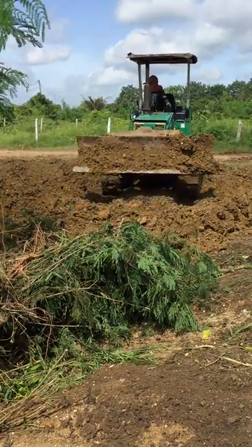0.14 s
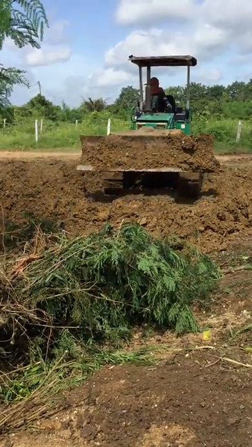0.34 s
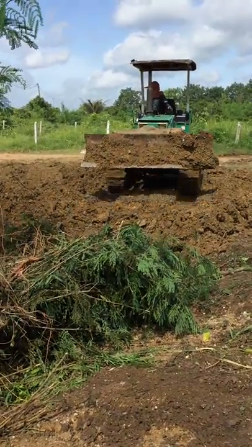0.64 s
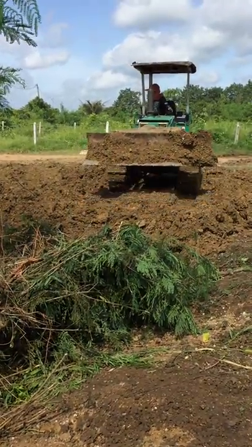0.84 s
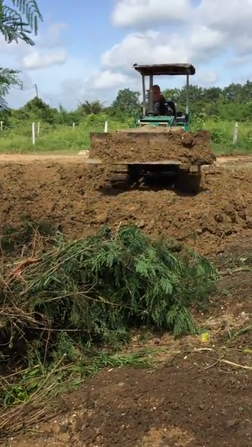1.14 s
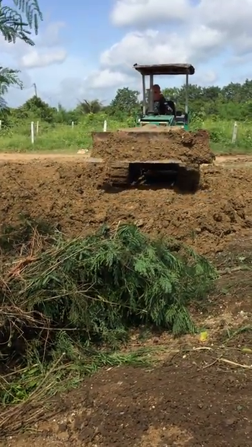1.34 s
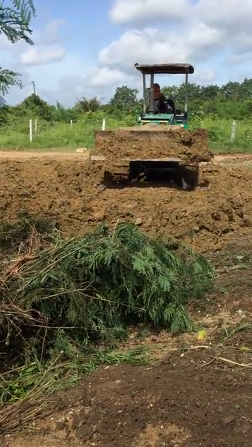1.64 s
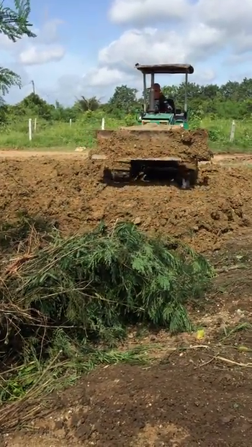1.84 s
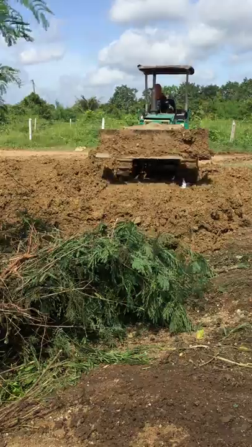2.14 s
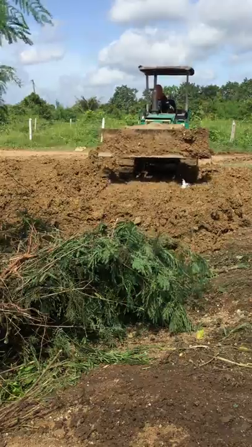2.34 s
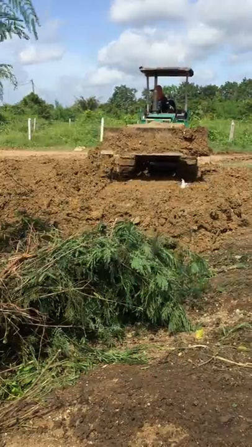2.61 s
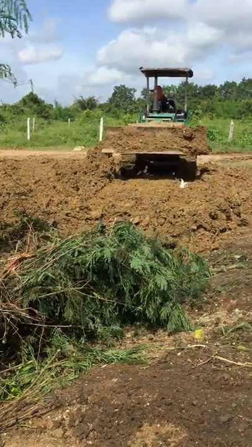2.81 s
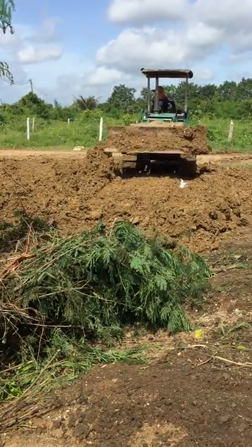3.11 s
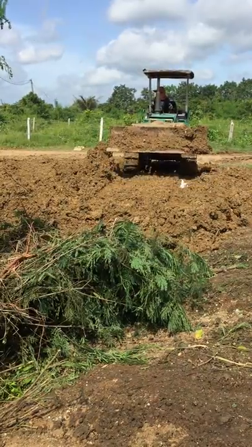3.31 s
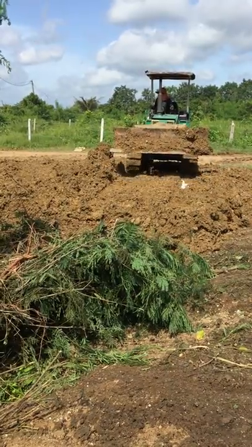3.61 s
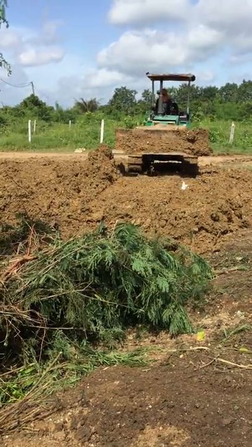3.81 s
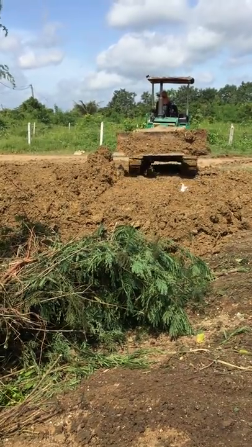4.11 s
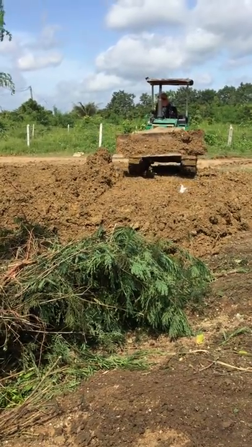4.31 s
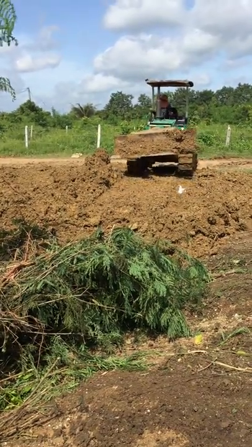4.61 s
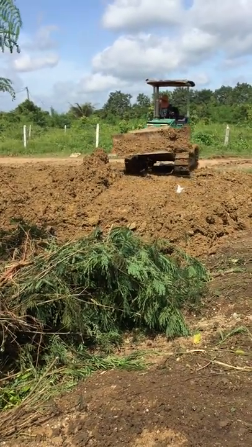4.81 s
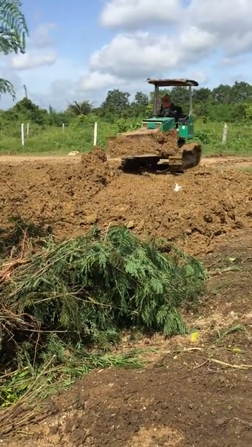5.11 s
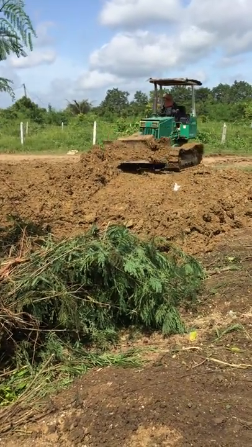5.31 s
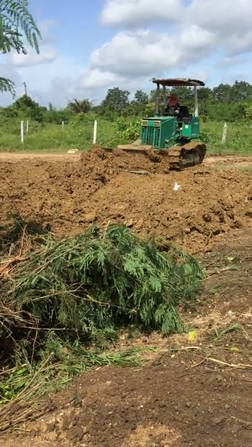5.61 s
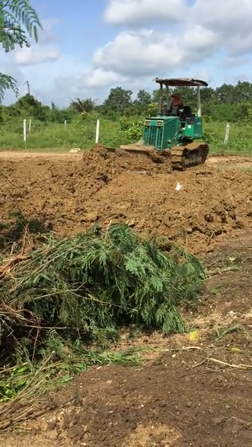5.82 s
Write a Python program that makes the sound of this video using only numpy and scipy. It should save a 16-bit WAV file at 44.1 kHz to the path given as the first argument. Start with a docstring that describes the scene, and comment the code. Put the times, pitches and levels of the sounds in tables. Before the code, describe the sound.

Outdoors on open soft ground, a small crawler bulldozer runs at a steady low diesel drone with metallic clatter and hiss. It backs slowly away from a fixed microphone about nine metres off while track links knock irregularly. A brief faint brake squeal comes midway, then a thin hydraulic whine; during the final turn the knocks nearly stop and thin squeals and a rasp appear.

```python
"""Open ground of soft soil: a small crawler bulldozer backs away from the microphone, from about 9 m,
then brakes one track and turns. Dull noise and hiss lie behind it, with a faint hydraulic whine.
Track links knock, ringing frame modes; thin squeals are wavering sines and the late rasp is resonant noise.
Closest to the ear is the four-cylinder diesel: noise swelling with combustion rings block and covers,
and gas pulses ring the exhaust pipe."""
import sys
import numpy as np
from scipy import signal
from scipy.fft import rfft, irfft, next_fast_len
from scipy.io import wavfile
from scipy.ndimage import uniform_filter1d

SR = 44100
rng = np.random.default_rng(int(sys.argv[2]) if len(sys.argv) > 2 else 0)


def master_out(mix):
    """Clip the mix to full scale and print it as 16-bit PCM to the path in sys.argv[1]."""
    frames = np.transpose(np.atleast_2d(mix))
    ceiling = np.clip(frames, -1, 1)
    pcm = np.round(ceiling * 32767).astype(np.int16)
    wavfile.write(sys.argv[1], SR, pcm)


N = 262395

# Engine speed. Each row: time in seconds, firings per second.
ENGINE_SPEED = [(0.0, 57.46), (0.2, 57.6), (0.4, 57.25), (0.6, 57.58), (0.8, 57.34), (1.0, 57.82),
                (1.2, 57.74), (1.4, 57.39), (1.6, 57.59), (1.8, 57.35), (2.0, 57.51), (2.2, 57.55),
                (2.4, 57.57), (2.6, 57.57), (2.8, 57.54), (3.0, 57.54), (3.2, 57.69), (3.4, 57.32),
                (3.6, 57.26), (3.8, 57.34), (4.0, 56.86), (4.2, 56.43), (4.4, 56.64), (4.6, 56.21),
                (4.8, 55.59), (5.0, 56.54), (5.2, 55.87), (5.4, 57.19), (5.6, 58.77), (5.8, 57.69),
                (5.95, 57.49)]
# Cylinders in firing order. Each row: place of the exhaust pulse in the cycle (0-1), then strength in dB
# for exhaust, covers, block and hiss.
CYLINDERS = [(.2028, -7.1, -2, -5, -3.5), (.4692, -2.9, -7, -1, -1), (.6795, -11.3, 0, -4, -2.5),
             (.9684, 0, 0, 0, 0)]
EXHAUST_COLUMN, COVER_COLUMN, BLOCK_COLUMN, HISS_COLUMN = 1, 2, 3, 4
GOVERNED_PER_S, FULL_SAG_PER_S = 57.4, 1.2  # firings per second unloaded; speed lost at full load

# The machine's place: metres at time zero, metres per second backing away.
START_M, BACKING_M_PER_S = 8.73, 1.16
TURN_S, TURN_LENGTH_S = 5.18, 0.24  # the flank swings round to face the microphone
BRAKE_FROM_S, BRAKE_TO_S, BRAKE_EDGE_S = 3.52, 4.08, 0.065  # the steering brake drags

# How levels follow the machine. Each row: base in dB, share of the distance loss,
# then dB added at full load, full turn and full brake.
RUMBLE_LEVEL = (-34, 1.01, 1.6, 2, 0.5)
HUM_LEVEL = (0, 0.9, 8, -13, 3.5)
HISS_LEVEL = (-45.5, 1.5, 0, 5, 3)
# The block's lean to its upper modes, by the same rule, in dB per octave.
BLOCK_LEAN_DB_PER_OCT = (-6, 2.5, 13, 8, -8)

# Soil, tracks and fan. Each row: frequency in Hz, relative density in dB per Hz.
RUMBLE_SPECTRUM = [(15, -47), (25, -24), (48, -12.5), (85, -10), (125, -7), (186, -7.5), (281, -19.5),
                   (408, -21), (1470, -24), (1880, -27.5), (2130, -31), (2850, -47), (3500, -39),
                   (4550, -84), (7700, -120)]
# Valve gear and gas. Each row: frequency in Hz, relative density in dB per Hz.
HISS_SPECTRUM = [(1760, 3), (3000, -1.5), (3170, -3.5), (3570, -1.5), (3900, -9.5), (4270, -5.5),
                 (4840, -11), (5260, -9.5), (6080, -9.5), (7690, -18), (9670, -13.5), (10500, -19),
                 (11600, -16.5), (14200, -19.5), (15700, -18)]
# Lift of the hiss bands above 6.5 kHz. Each row: time in seconds, lift in dB.
TREBLE_LIFT = [(0, 0), (2.2, 1.6), (2.8, -2.5), (3.45, -3), (3.65, 0.5), (4.4, 3.5), (5.0, 2), (5.95, 1.5)]
# Hydraulic whine. Each row: time in seconds, pitch in Hz, level in dB.
PUMP_WHINE = [(3.95, 680, -54), (4.05, 681, -46.5), (4.17, 681, -50), (4.21, 676, -60), (4.27, 680, -46),
              (4.4, 679, -51), (4.55, 675, -50), (4.72, 677, -51), (4.9, 676, -58)]

# Track frame modes. Each row: frequency in Hz, strength in dB, time to fall 60 dB in seconds.
FRAME_MODES = [(397, 8.5, 0.037), (476, 7.5, 0.044), (569, 2, 0.051), (710, 7, 0.029), (788, 9, 0.024),
               (970, 7, 0.039), (1150, 10.5, 0.026), (1280, 6.5, 0.022), (1560, -2, 0.012),
               (1816, 7.5, 0.028), (2200, 0, 0.012)]
# Track links knocking. Each row: peak time in seconds, relative level in dB, pitch in Hz,
# ring as a share of the frame's fall time.
LINK_KNOCKS = [(.0273, -29.5, 1040, 0.28), (.0337, -33, 890, .4), (.1585, -25.5, 870, 0.46),
               (.2842, -33, 740, .4), (.3359, -31, 1290, 1.1), (.4756, -35, 674, .4),
               (.5531, -32, 1880, 1.0), (.7295, -38, 490, .7), (.7985, -31, 1160, 0.55),
               (.8523, -31, 950, 0.45), (1.0739, -27.5, 780, .5), (1.15, -34, 720, .5),
               (1.1792, -27, 1870, 1.6), (1.2189, -26.5, 756, 0.52), (1.2532, -28.5, 655, 1.1),
               (1.2560, -25.5, 664, 0.9), (1.3367, -30, 1050, 0.58), (1.3738, -30, 1000, 0.48),
               (1.3985, -28, 1600, .5), (1.3999, -30, 520, .6), (1.5147, -30, 960, 0.31),
               (1.5244, -22.5, 1040, 0.61), (1.5255, -32, 2100, .6), (1.5675, -29, 450, 1.1),
               (1.5685, -27, 1150, 0.54), (1.6643, -22.5, 970, 0.69), (1.6703, -33, 970, 0.29),
               (1.6781, -23.5, 945, 1.1), (1.831, -29, 680, 0.47), (1.8590, -30.5, 1550, 0.65),
               (1.8639, -28.5, 690, 0.5), (2.0054, -24, 940, 0.62), (2.0141, -30, 1070, .5),
               (1.975, -31, 760, .5), (2.0338, -25, 1500, .6), (2.0342, -35, 1950, .5),
               (2.0349, -26, 543, 0.78), (2.0647, -33, 910, 0.28), (2.4807, -30.5, 610, .6),
               (2.4859, -45, 650, .6), (2.7322, -34, 466, 0.9), (2.7813, -31.5, 1180, 1.3),
               (2.8504, -33, 570, .9), (2.877, -27.5, 795, .5), (3.0019, -31, 557, 1.1),
               (3.196, -32, 830, .6), (3.2074, -31, 890, .4), (3.262, -29.5, 626, .6),
               (3.3542, -29, 1110, 0.34), (3.533, -25.5, 846, 0.4), (3.5464, -27.5, 690, .5),
               (3.547, -34, 2100, .5), (3.6605, -51, 500, 1.5), (3.6625, -25.5, 1200, 0.62),
               (3.6641, -27, 420, 0.86), (3.6883, -30, 654, 0.45), (3.834, -26.5, 790, 0.86),
               (3.8495, -29, 1780, .6), (3.8515, -30, 1310, .6), (3.8525, -25.5, 557, 1.1),
               (3.9863, -29.5, 540, 1.1), (4.0041, -26.5, 650, 1.3), (4.006, -31, 1200, 0.98),
               (4.0083, -31, 480, 0.65), (4.0164, -35, 590, 1.3), (4.0539, -30, 1130, 0.54),
               (4.1205, -30, 1020, .4), (4.156, -25, 690, 1.2), (4.158, -31, 417, 1.2),
               (4.1613, -31, 520, 0.55), (4.3158, -22.5, 710, 0.92), (4.3203, -44, 720, 0.6),
               (4.4777, -25.5, 915, 0.51), (4.4827, -40, 1020, 0.31), (4.6464, -36, 1040, 0.45),
               (4.651, -34, 730, 0.41), (5.43, -38, 420, 1.7), (5.735, -35, 710, 1.6)]
KNOCK_LIFT_DB, REBOUND_DB = 2.5, -13  # lift of every blow; a rebound against its knock
KNOCK_RISE_S = 0.0017  # from contact to the peak of a knock
CRACK_DB, CRACK_T60_S = -14.5, 0.011  # bright contact at the head of each blow

# Brake squeals. Each row: start in seconds, length in seconds, pitch in Hz, glide in Hz,
# level at the start in dB, swell to the end in dB.
SQUEALS = [(3.525, .06, 13810, 0, -65, -4), (3.575, .09, 14840, -80, -57, -6),
           (3.625, .16, 15375, 5, -50, -2), (3.78, .07, 15390, 30, -63, -8),
           (5.405, .135, 15700, -45, -46, 8), (5.545, .045, 15710, 0, -60, 0),
           (5.475, .11, 14700, -70, -51, 1), (5.68, .035, 14600, 60, -60, 0),
           (5.47, .14, 12185, 60, -48, 2), (5.685, .065, 11430, 20, -56, 0), (5.44, .2, 2682, 0, -56, 1),
           (5.54, .11, 1965, -10, -55, -2), (5.88, .07, 860, 0, -54, 3)]
# The squeal that sags and recovers. Each row: time in seconds, pitch in Hz, level in dB.
LONG_SQUEAL = [(5.57, 5900, -60), (5.604, 5883, -50), (5.638, 5739, -56), (5.685, 5728, -57),
               (5.72, 5720, -46), (5.742, 5730, -41.5), (5.757, 5765, -54), (5.77, 5816, -51),
               (5.782, 5820, -64), (5.814, 5710, -68), (5.854, 5730, -59), (5.875, 5780, -68)]
# Rough ring of the brake drum late in the turn. Each row: time in seconds, level in dB.
RASP_LEVEL = [(5.4, -66), (5.6, -54), (5.75, -52), (5.95, -52)]
RASP_HZ, RASP_WIDTH_HZ = 2934, 180

# Engine covers. Each row: frequency in Hz, width in Hz.
COVER_MODES = [(1495, 35), (1655, 44), (1724, 34), (1840, 59), (1950, 59)]
# Loudness of the covers. Each row: time in seconds, then level in dB for each cover mode in turn.
COVER_LEVELS = [(0, -53, -49, -49, -45, -56), (.3, -50, -51, -48, -44.5, -51),
                (.8, -64, -50, -49, -47, -51), (1.15, -63, -56, -57, -51, -55),
                (1.5, -64, -50, -51, -51, -58), (2.0, -61, -51.5, -50, -43, -49.5),
                (2.6, -69, -53, -51, -52, -55), (3.3, -64, -51, -51.5, -52, -53),
                (3.9, -66, -54, -53, -51, -52), (4.4, -61, -57, -53, -48.5, -52),
                (4.9, -56, -55, -52, -47, -49.5), (5.3, -58, -61, -54, -54, -50),
                (5.6, -68, -64, -59, -61, -61), (5.8, -65, -60, -50.5, -58, -60),
                (5.95, -62, -53, -45, -45, -52)]
TAPS_PER_S, TAP_DB = 90, 25  # loose parts tap the covers: mean rate, force against the combustion noise
# Engine block. Each row: frequency in Hz, width in Hz, strength in dB.
BLOCK_MODES = [(2472, 300, 0), (2686, 200, 7), (2864, 170, 7.5), (3030, 230, -10), (3390, 430, -10.5)]
# Loudness of the block's clatter. Each row: time in seconds, level in dB.
BLOCK_LEVEL = [(0, -46.5), (.5, -49), (1.0, -51), (1.5, -48.5), (2.0, -50.5), (2.6, -50), (3.1, -50),
               (3.6, -50.5), (4.1, -51), (4.6, -51.5), (5.1, -50.5), (5.4, -53.5), (5.7, -52.5),
               (5.82, -49), (5.95, -51)]
HARSHNESS_DB = 2.5  # spread of combustion force, shared by covers, block and hiss

# Exhaust pipe and silencer. Each row: frequency in Hz, width in Hz, gain in dB, sign at the outlet, group.
PIPE_MODES = [(57.2, 9, 30.4, -1, 0), (112.8, 20.1, 32.6, 1, 1), (161.28, 12.02, 46.31, 1, 2),
              (162.01, 9, 48.13, -1, 2), (180.8, 9, 34.3, -1, 3), (230.6, 9, 21.8, 1, 4),
              (142, 9, 19, 1, 5), (170, 9, 28, 1, 5), (200, 9, 21, -1, 5), (213, 9, 20, -1, 6),
              (128, 9, 25, -1, 7)]
# How strongly the pipe modes reach the microphone as distance, load and bearing change.
# Each row: time in seconds, then level in dB for groups 0 to 7.
PIPE_LEVELS = [(0, 3, 3.5, -3, -2.5, -3, -20, -15, 2), (.5, 3.5, 2.5, 1.5, -0.5, 2.5, -18, -13, -7),
               (1.0, 2, 1.3, 1, 2, -5, -22, -12, 3), (1.5, 2, 1.6, -0.5, 1.5, 1, -20, -6, 3),
               (2.0, 2, 1, 1, -1, 2.5, -17, -6, -20), (2.5, 2.2, -0.2, 3, 1.6, 3, -18, -3.5, -25),
               (3.0, 2.5, -2, 2, 2, 2, -16, -1, -24), (3.5, 2.2, -2.9, 1.5, 1.6, 0, -8, 2, -17),
               (3.9, 2, -6, -2.2, 0.5, 4, -5.5, -3, -19), (4.3, 1.8, -2, -8, -0.5, 5.5, 0.5, 0, -4),
               (4.7, 0.5, 1, -16, -2, 9.5, 2, 8, 1), (5.1, 0.8, .3, -7, -1, 8, -0.5, 9.5, -1),
               (5.45, 1.5, -2, -8, -4.5, 5.5, -6, 6, 1), (5.95, -0.5, -7.5, -12, -6, -3, -5.5, -8, 2)]
SILENCER_HZ, OUTLET_HZ = 188.5, 51.5  # low-pass and high-pass corners

CUTOFF_HZ = 15780  # top of the recorded band


def amp(db):
    """Turns dB into an amplitude factor."""
    return 10 ** (np.asarray(db) / 20)


def rms_one(x):
    """Scales a signal to rms 1."""
    return x / np.sqrt(np.mean(x ** 2) + 1e-20)


def in_time(rows):
    """Draws each column of a table as a curve over the scene."""
    s, *columns = np.transpose(rows)
    return [np.interp(np.arange(N) / SR, s, c) for c in columns]


def drift(rate_hz):
    """Random wander of spread 1: low-passed noise, made at a fortieth of the sample rate."""
    r = np.exp(-80 * np.pi * rate_hz / SR)
    white = rng.standard_normal(N // 40 + 2002)
    slow = signal.lfilter([1], [1, -2 * r, r * r], white)[2000:]
    return np.interp(np.arange(N) / 40, np.arange(len(slow)), rms_one(slow))


def resonate(x, hz, width_hz):
    """Rings one damped mode, about gain 1 at its peak."""
    r = np.exp(-np.pi * width_hz / SR)
    feedback = [1, -2 * r * np.cos(2 * np.pi * hz / SR), r * r]
    return signal.lfilter([(1 - r * r) / 2, 0, (r * r - 1) / 2], feedback, x)


def resonate_twice(x, hz, width_hz, widening):
    """Rings a mode twice over, so that the valleys between modes stay dark."""
    return resonate(resonate(x, hz, width_hz), hz, widening * width_hz)


def colour(x, spectrum):
    """Filters noise by a spectrum drawn over log frequency; rms 1."""
    size = next_fast_len(N)
    hz, db = np.transpose(spectrum)
    bin_hz = np.arange(size // 2 + 1) * SR / size
    gain = amp(np.interp(np.log(bin_hz + 1), np.log(hz), db, left=-90, right=-90))
    return rms_one(irfft(rfft(x, size) * gain, size)[:N])


def motion():
    """Follows distance, load, turn and brake; returns a function from a level row to its curve."""
    t = np.arange(N) / SR
    loss_db = -20 * np.log10(1 + BACKING_M_PER_S * t / START_M)
    sag = uniform_filter1d(GOVERNED_PER_S - in_time(ENGINE_SPEED)[0], size=SR // 3)
    load = np.clip(sag / FULL_SAG_PER_S, 0, 1)
    turn = np.clip((t - TURN_S) / TURN_LENGTH_S, 0, 1)
    brake = np.clip(np.minimum(t - BRAKE_FROM_S, BRAKE_TO_S - t) / BRAKE_EDGE_S, 0, 1)
    state = np.array([np.ones(N), loss_db, load, turn, brake])
    return lambda row: np.array(row) @ state


def firings(column, spread_db, run_in=0, places=None, shared_db=0):
    """One click per firing, as strong as its cylinder give or take chance, after run_in samples of lead."""
    speed = in_time(ENGINE_SPEED)[0]
    whole_run = np.r_[np.full(run_in, speed[0]), speed]
    cycles = (np.cumsum(whole_run) - run_in * speed[0]) / SR / len(CYLINDERS)
    clicks = np.zeros(run_in + N)
    for row, place in zip(CYLINDERS, places or [row[0] for row in CYLINDERS]):
        at = np.flatnonzero(np.diff(np.floor(cycles - place)))
        clicks[at] = amp(row[column] + spread_db * rng.standard_normal(len(at)))
    return clicks * amp(shared_db) + 1e-18


def combustion_noise(column, steady, lead_s, fall_s, patchy_db, harsh_db, spread_db=4.5):
    """Noise that swells and sinks around evenly spaced firings, over a steady share."""
    t = np.arange(SR // 40) / SR
    blows = firings(column, spread_db, places=[.25, .5, .75, 1.], shared_db=harsh_db)
    swell = signal.oaconvolve(blows, (t / fall_s) ** 2 * np.exp(-t / fall_s))[:N]
    gate = steady + np.roll(swell, -int(lead_s * SR))  # the swell starts a little early
    return gate * amp(patchy_db * drift(22)) * rng.standard_normal(N)


def whistle(rows, waver_db, jitter_hz, edge_s):
    """A near sine on its pitch curve that trembles in pitch and strength and fades at both ends."""
    hz, db = in_time(rows)
    t = np.arange(N) / SR
    fade = np.clip(np.minimum(t - rows[0][0], rows[-1][0] - t) / edge_s, 0, 1) ** 2
    phase = 2 * np.pi * np.cumsum(hz + jitter_hz * drift(65.0)) / SR
    return np.sqrt(2) * fade * amp(db + waver_db * drift(34)) * np.sin(phase)


def rumble(hum_db):
    """Soil and rollers: dull noise, part of it ringing the two lowest frame modes; rms 1."""
    noise = colour(amp(drift(11.5)) * rng.standard_normal(N), RUMBLE_SPECTRUM)
    low_hum = amp(hum_db) * resonate(noise, FRAME_MODES[0][0], 37.0)
    high_hum = 0.5 * resonate(noise, FRAME_MODES[1][0], 10.0)
    return rms_one(noise + low_hum + high_hum)


def hiss(harsh_db):
    """Gas and valve noise, swelling with the firings and uneven in strength; made in five bands; rms 1."""
    edges_hz = [1000, 3600, 5000, 6500, 10500, 17000]
    bands = []
    for edge in zip(edges_hz, edges_hz[1:]):
        noise = combustion_noise(HISS_COLUMN, steady=1.0, lead_s=0.0028, fall_s=0.003,
                                 patchy_db=1.7, harsh_db=harsh_db, spread_db=3.5)
        bands.append(signal.sosfilt(signal.butter(2, edge, "band", fs=SR, output="sos"), noise))
    treble = amp(in_time(TREBLE_LIFT)[0]) * sum(bands[3:])
    return colour(sum(bands[:3]) + treble, HISS_SPECTRUM)


def pump():
    """Hydraulic whine: one wavering near sine."""
    return whistle(PUMP_WHINE, waver_db=1.3, jitter_hz=2.5, edge_s=.05)


def knocks():
    """A knock and two rebounds ring the frame modes nearest its pitch, more or less damped by mud."""
    out, t = np.zeros(N + SR), np.arange(SR // 12)[:, None] / SR
    count = 120  # small knocks at random times
    small = np.c_[rng.uniform(.01, N / SR, count), -40 + 3 * rng.exponential(1, count).clip(0, 2.1),
                  rng.uniform(400, 1100, count), rng.uniform(.4, .9, count)]
    mode_hz, mode_db, t60 = np.transpose(FRAME_MODES)
    bright = signal.butter(1, [900, 3500], "band", fs=SR, output="sos")
    soft_contact = (1 - np.exp(-t / .0009)) ** 2
    in_step = np.cos(2 * np.pi * mode_hz * (t - KNOCK_RISE_S))  # modes agree in phase at the peak
    for s, db, hz, ring in np.r_[LINK_KNOCKS, small]:
        rings = in_step * amp(-60 * t / (t60 * max(ring, .2))) * soft_contact
        reach_db = -30.0 * np.log2(mode_hz / hz) ** 2
        blows = [(0, db), (rng.uniform(.00344, .009), db + REBOUND_DB),
                 (rng.uniform(.011, .02), db + REBOUND_DB)]
        for wait_s, blow_db in blows:
            hit = rings @ amp(mode_db + reach_db + 2.0 * rng.standard_normal(len(FRAME_MODES)))
            burst = rng.standard_normal(len(t)) * amp(CRACK_DB - 60 * t[:, 0] / CRACK_T60_S)
            crack = signal.sosfilt(bright, burst)
            at = int((s - KNOCK_RISE_S + wait_s) * SR)
            out[at:at + len(t)] += amp(blow_db + KNOCK_LIFT_DB) * (hit / np.abs(hit).max() + crack)
    return out[:N]


def rasp():
    """Noise through one brake drum resonance, twice."""
    noise = amp(1.2 * drift(25)) * rng.standard_normal(N)
    ring = resonate_twice(noise, RASP_HZ, RASP_WIDTH_HZ, widening=1)
    return amp(in_time(RASP_LEVEL)[0]) * rms_one(ring)


def squeals():
    """Brake squeals: short whistles that glide and swell evenly, and a long one on its own curve."""
    out = whistle(LONG_SQUEAL, waver_db=0.8, jitter_hz=7.6, edge_s=0.01)
    for start, length, hz, glide_hz, db, swell_db in SQUEALS:
        ends = [(start, hz, db), (start + length, hz + glide_hz, db + swell_db)]
        out = out + whistle(ends, waver_db=2.5, jitter_hz=23.6, edge_s=0.01)
    return out


def covers(harsh_db):
    """Combustion noise and stray taps ring each cover mode at its own loudness."""
    noise = combustion_noise(COVER_COLUMN, steady=0.33, lead_s=0.0012, fall_s=0.0016,
                             patchy_db=0.0, harsh_db=harsh_db)
    taps = (rng.random(N) < TAPS_PER_S / SR) * amp(TAP_DB + 2.7 * rng.standard_normal(N))
    drive = rms_one(noise) + taps
    return sum(amp(db) * rms_one(resonate_twice(drive, hz, width, widening=1.6))
               for (hz, width), db in zip(COVER_MODES, in_time(COVER_LEVELS)))


def block(harsh_db, lean_db):
    """Combustion noise rings the block's modes, leaning to the upper or lower ones."""
    noise = combustion_noise(BLOCK_COLUMN, steady=0.48, lead_s=0.0008, fall_s=0.0012,
                             patchy_db=0.5, harsh_db=harsh_db)
    middle_hz = np.mean(np.transpose(BLOCK_MODES)[0])
    rings = sum(amp(db + lean_db * np.log2(hz / middle_hz)) * resonate_twice(noise, hz, width, widening=1.56)
                for hz, width, db in BLOCK_MODES)
    return amp(in_time(BLOCK_LEVEL)[0]) * rms_one(rings)


def exhaust():
    """Gas pulses, dulled by the silencer and thinned by the small outlet, ring the pipe modes."""
    pulses = firings(EXHAUST_COLUMN, spread_db=0.5, run_in=SR // 2)  # already running at time zero
    pulses = signal.sosfilt(signal.butter(4, SILENCER_HZ, fs=SR, output="sos"), pulses)
    pulses = signal.sosfilt(signal.butter(2, OUTLET_HZ, "high", fs=SR, output="sos"), pulses)
    levels = in_time(PIPE_LEVELS)
    return sum(sign * amp(db + levels[group]) * resonate(pulses, hz, width)[-N:]
               for hz, width, db, sign, group in PIPE_MODES)


def scene():
    """Lays the machine's sounds together, from the background to the engine, in one channel."""
    level_db = motion()
    harsh_db = HARSHNESS_DB * drift(73.0)
    background = amp(level_db(RUMBLE_LEVEL)) * rumble(level_db(HUM_LEVEL))
    background = background + amp(level_db(HISS_LEVEL)) * hiss(harsh_db) + pump()
    tracks = knocks() + squeals() + rasp()
    engine = covers(harsh_db) + block(harsh_db, level_db(BLOCK_LEAN_DB_PER_OCT)) + exhaust()
    return (background + tracks + engine)[None]


def record(dry):
    """A steep low-pass cuts the top of the band."""
    return signal.sosfilt(signal.ellip(12, .3, 60, CUTOFF_HZ, fs=SR, output="sos"), dry)


dry = scene()
out = record(dry)
master_out(out)
```